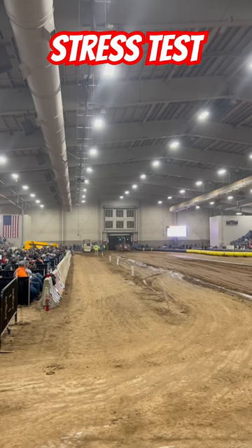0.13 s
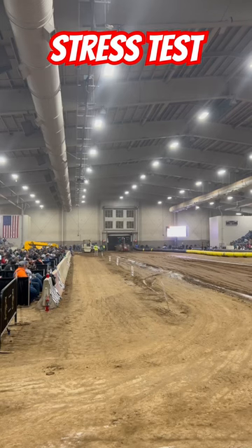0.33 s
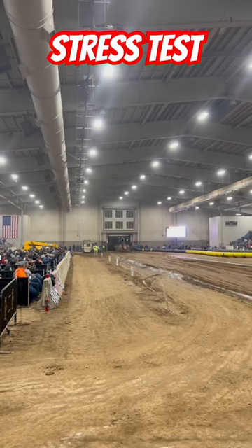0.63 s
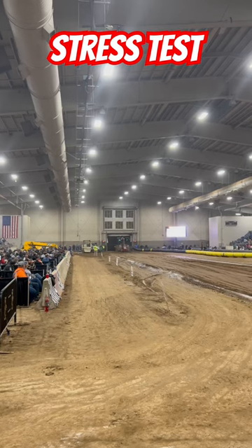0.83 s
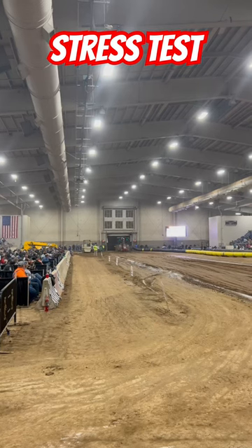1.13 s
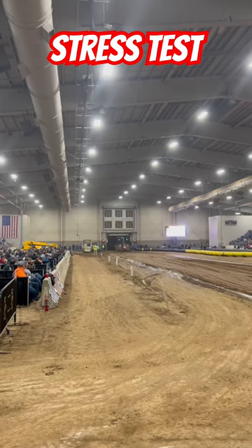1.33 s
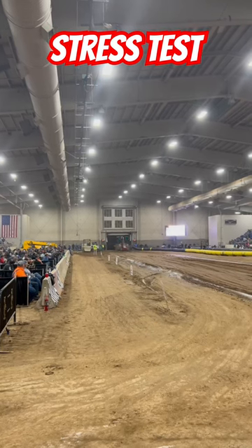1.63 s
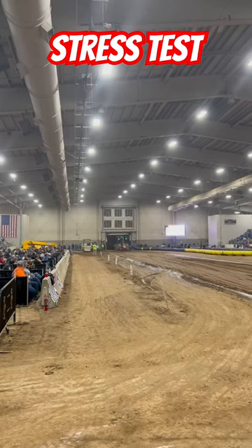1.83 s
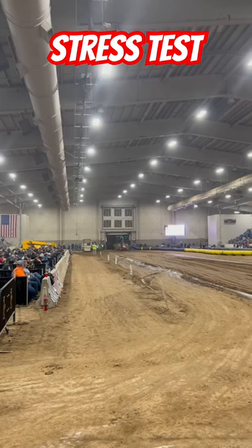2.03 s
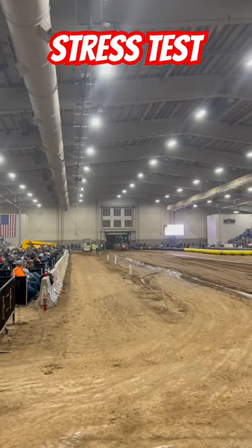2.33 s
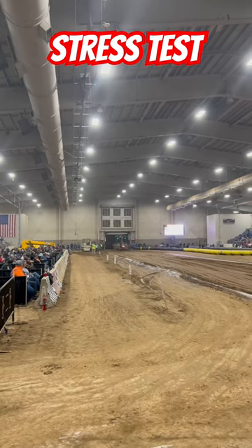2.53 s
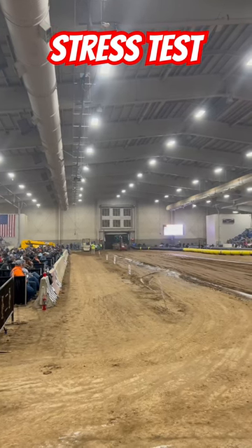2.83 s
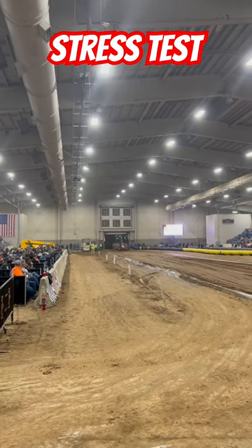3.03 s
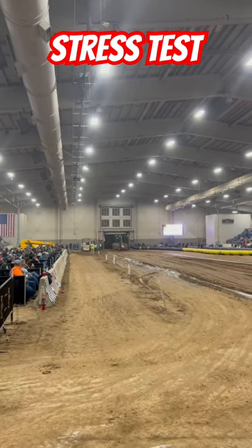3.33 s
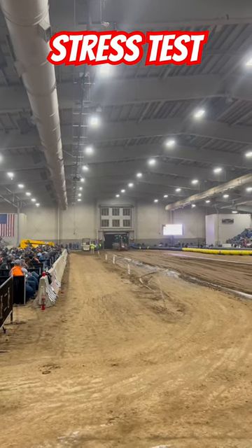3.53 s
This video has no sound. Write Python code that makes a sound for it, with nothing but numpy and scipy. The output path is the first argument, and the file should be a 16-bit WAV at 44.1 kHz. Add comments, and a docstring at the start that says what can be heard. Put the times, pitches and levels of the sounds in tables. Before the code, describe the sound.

A tractor's turbo-diesel roars from the far end of a large indoor arena, its droning note climbing and fluttering; the turbo whistle rises with a rush of air, then the engine turns deeper and rougher. Distant stereo microphone.

```python
"""Pulling tractor in an indoor arena

A six-cylinder turbo-diesel winds up under load at the far end of a large hall. The firing note climbs and fades
in and out; sines locked to the engine cycle make it, the boom and the lines of uneven cylinders.
Banded noise makes the exhaust roar, a repeated random pattern the crackle, sines the turbo's rising whistle.
Noise makes the rush of air and a brief squeal; at full boost the engine turns deeper and rougher."""
import sys
import numpy as np
from scipy import signal
from scipy.io import wavfile
from scipy.ndimage import uniform_filter1d, minimum_filter1d

SR = 44100
rng = np.random.default_rng(int(sys.argv[2]) if len(sys.argv) > 2 else 0)


def persist_wave(psi):
    """Save psi, clipped to +-1, as 16-bit WAV."""
    counts = np.round(np.clip(psi, -1, 1) * 32767).astype(np.int16)
    wavfile.write(sys.argv[1], SR, np.atleast_2d(counts).T)


N = 163170
T = np.arange(-SR, N) / SR   # seconds; the engine is already running a second earlier
FADE_HZ = 3.95   # how fast lines wander as reflections add and cancel

# Engine speed. Each row: time in seconds, firings per second.
FIRING_RATE = [(0, 214), (.3, 217), (.6, 223), (1, 227), (1.35, 230.5), (1.7, 237.5), (2.05, 242),
               (2.3, 249), (2.6, 251.3), (3.05, 252.3), (3.4, 249), (3.7, 246)]
# Exhaust roar. Each row: time in seconds, level of the low roar in dB, level of the rasp in dB,
# both before each layer's own offset.
ROAR = [(0.06, -30, -33.5), (0.41, -27.5, -34), (0.46, -28.5, -33), (1.61, -30.5, -29), (1.66, -27, -27.5),
        (2.1, -28.5, -30), (2.35, -26, -30.5), (2.44, -27.5, -29), (2.93, -24, -27.5), (3.1, -25.5, -29.5),
        (3.68, -26.5, -31)]
# Lines from unequal cylinders. Each entry: multiple of the six-firing engine cycle.
UNEVEN_ORDERS = [3, 4, 5, 7, 8, 9, 10, 12, 14, 15, 16, 20]


def from_db(db):
    """Decibels to gain."""
    return 10 ** (np.asarray(db) / 20)


def rms_one(x):
    """Scale to unit power."""
    return x / np.sqrt(np.mean(x ** 2) + 1e-20)


def in_time(rows):
    """Each column of a curve at every sample."""
    s, *columns = np.transpose(rows)
    return [np.interp(T, s, c) for c in columns]


def at_hz(points, hz):
    """Read a spectrum on a log-frequency axis."""
    f, v = np.transpose(points)
    return np.interp(np.log(hz), np.log(f), v)


def swell(centre_s, length_s):
    """A smooth rise and fall, peaking at 1."""
    return np.exp(-((T - centre_s) / length_s) ** 2)


def stage(centre_s, rise_s):
    """A smooth step from 0 to 1."""
    return (1 + np.tanh((T - centre_s) / rise_s)) / 2


def drift(rate_hz):
    """Slow chance of unit power: noise through two equal low-passes, computed every 40 samples."""
    step = 40
    r = np.exp(-2 * np.pi * rate_hz * step / SR)
    noise = rng.standard_normal(len(T) // step + 2002)
    slow = signal.lfilter([1], [1, -2 * r, r * r], noise)[2000:]   # drop the filter's start
    return np.interp(np.arange(len(T)) / step, np.arange(len(slow)), rms_one(slow))


def fading():
    """Slowly changing strength and phase of the reflections of one line."""
    return (drift(FADE_HZ) + 1j * drift(FADE_HZ)) / np.sqrt(2)


def spread(mid, side, hz):
    """Left and right, as wide as the hall makes this frequency."""
    # Hall width. Each row: frequency in Hz, side against middle in dB.
    width = [(60, -43), (96, -21), (150, -19), (250, -20.5), (400, -3.5), (630, 0), (1020, 0.5), (1630, -7),
             (2610, -6.5), (4190, -7), (6710, 1.5), (10800, -6.5)]
    # Balance between the sides. Each row: frequency in Hz, left minus right in dB.
    lean = [(60, -0.36), (130, -0.12), (260, 1.8), (550, -0.7), (1160, -3), (2440, -0.29), (5130, -0.085),
            (10800, -0.5)]
    sign = np.array([[1], [-1]])
    stereo = mid + sign * side * from_db(at_hz(width, hz))
    return stereo * from_db(sign * at_hz(lean, hz) / 2)


def band_pass(x, low_hz, high_hz):
    """Keep one frequency band."""
    return signal.sosfilt(signal.butter(3, [low_hz, high_hz], "band", fs=SR, output="sos"), x)


def turbulence(spectrum):
    """Stereo noise in third-octave bands that flicker separately; the middle has unit power."""
    flicker_db, flicker_hz = 1.0, 15.5
    lowest, highest = spectrum[0][0], spectrum[-1][0]
    bands = int(round(3 * np.log2(highest / lowest)))
    edges = np.geomspace(lowest, highest, bands + 1)
    white = rng.standard_normal((2, 2, len(T)))   # two stereo noises, used by alternate bands
    out = 0
    for k, (low, high) in enumerate(zip(edges, edges[1:])):
        mid, side = band_pass(white[k % 2], low, high)
        hz = np.sqrt(low * high)
        level = from_db(at_hz(spectrum, hz) + flicker_db * drift(flicker_hz))
        out = out + level * spread(mid, side, hz)
    return out / np.std(out.mean(axis=0))


def resonance(hz, width_hz):
    """Stereo noise ringing in two equal two-pole resonators in a row."""
    r = np.exp(-np.pi * width_hz / SR)
    poles = [1, -2 * r * np.cos(2 * np.pi * hz / SR), r * r]
    noise = rng.standard_normal((2, len(T)))
    mid, side = rms_one(signal.sosfilt([[1, 0, -1] + poles] * 2, noise))
    return spread(mid, side, hz)


def hall(x, t60):
    """Dense reflections dying away by 60 dB in t60 seconds, different on each side."""
    t = np.arange(SR) / SR
    tail = rng.standard_normal((2, SR)) * from_db(-60 * t / t60)
    tail = rms_one(tail) / np.sqrt(SR)
    return signal.fftconvolve(x[None], tail, axes=1)[:, :len(T)]


def standing_out(k):
    """Extra dB of one engine line, which stands out for a moment."""
    # Each row: multiple of the engine cycle, time in seconds, half length in seconds, gain in dB.
    line_swells = [(14, .85, .12, 4), (14, 1.7, .15, 5), (10, 1.95, .15, 7), (4, 2.3, .15, 6),
                   (20, 2.28, .16, 5), (16, 2.98, .17, 8)]
    return sum(db * swell(s, length) for multiple, s, length, db in line_swells if round(multiple) == k)


def engine_lines(cycle, cycle_hz):
    """Firing note, crankshaft boom and the lines of unequal cylinders, all locked to the engine cycle."""
    # Firing note. Each row: time in seconds, level in dB.
    firing = [(0.05, -19), (0.24, -20.5), (0.3, -29), (0.38, -17), (0.46, -19.5), (0.49, -33),
              (0.52, -19.5), (0.58, -19), (0.635, -25), (0.67, -23), (0.76, -16.5), (0.92, -20.5),
              (0.96, -24.5), (1.08, -20), (1.16, -28), (1.3, -13), (1.42, -15), (1.48, -27), (1.55, -16.5),
              (1.62, -23.5), (1.66, -18.5), (1.94, -17.5), (1.99, -32), (2.02, -16.5), (2.08, -37),
              (2.11, -15), (2.18, -30.5), (2.21, -16), (2.24, -29.5), (2.29, -13.5), (2.32, -29),
              (2.36, -12.5), (2.59, -23), (2.61, -13), (3.13, -9.5), (3.22, -15), (3.27, -23), (3.295, -42),
              (3.32, -19.5), (3.37, -11), (3.49, -17.5), (3.68, -10.5)]
    # Once-per-turn crankshaft boom. Each row: time in seconds, level in dB.
    boom = [(0, -39), (1.3, -41), (1.5, -31), (2.05, -30.5), (2.12, -36), (2.25, -21), (2.36, -28.5),
            (2.55, -18), (2.8, -13.5), (2.96, -22), (3.1, -22), (3.3, -32), (3.45, -38), (3.54, -26),
            (3.7, -53)]
    # Levels of the uneven-cylinder lines in dB, one per order: winding up, turbo spooling, full load.
    winding_db = [-39.5, -30, -41, -51.5, -33, -57.5, -46, -48.5, -41, -51, -44, -41]
    spooling_db = [-41, -30.5, -34.5, -45.5, -27, -44.5, -34.5, -40.5, -33.5, -47.5, -70, -44]
    loaded_db = [-31, -34.5, -30.5, -38.5, -40.5, -33, -35, -36.5, -33.5, -40, -35, -42.5]
    steady_share, fading_share = 0.79, 0.6
    spool, load = stage(1.13, 0.13), stage(2.3, 0.48)

    out = 0
    for k, curve in ((6, firing), (2, boom)):
        line = from_db(in_time(curve)[0]) * np.exp(1j * k * cycle)
        out = out + spread(line.real, (line * fading()).real, k * cycle_hz)
    for k, winding, spooling, loaded in zip(UNEVEN_ORDERS, winding_db, spooling_db, loaded_db):
        db = winding + (spooling - winding) * spool + (loaded - spooling) * load + standing_out(k)
        line = from_db(db) * np.exp(1j * (k * cycle + 2 * np.pi * rng.random()))
        mid = (line * (steady_share + fading_share * fading())).real
        out = out + spread(mid, (line * fading()).real, k * cycle_hz)
    return np.sqrt(2) * out   # levels are RMS


def growl(cycle, cycle_hz):
    """The higher engine lines arrive only by reflection, each fading in and out."""
    level_db, slope_db, scatter_db = -19, -7.5, 4.5   # against the low roar, per octave, unevenness
    low_roar_db = in_time(ROAR)[0]
    out = 0
    for k in sorted(set(range(11, 31)) - set(UNEVEN_ORDERS)):
        octaves = np.log2(k / 16)
        db = level_db + slope_db * octaves + scatter_db * rng.standard_normal()
        line = from_db(db) * np.exp(1j * k * cycle)
        out = out + spread((line * fading()).real, (line * fading()).real, k * cycle_hz)
    return np.sqrt(2) * from_db(low_roar_db) * out


def exhaust(cycle):
    """Turbulent gas from the stack: swelling rumble, low roar and rasp puffing with crankshaft and firings."""
    # Colour of each noise. Each row: frequency in Hz, relative band level in dB.
    rumble_spectrum = [(25, -14), (45, -15), (68, -13), (88, -3), (115, -17), (230, -3), (320, -3),
                       (420, -14), (700, -36)]
    low_spectrum = [(200, -27.5), (330, -5.5), (450, -2), (600, 1.5), (800, -4), (1000, -9), (1400, -18.5),
                    (2500, -41.5)]
    rasp_spectrum = [(600, -3.5), (1000, -2), (1300, 1.5), (1800, -1), (2300, -1.5), (3000, 0), (3900, -6),
                     (5100, -12), (6300, -18), (7500, -20.5), (9500, -27), (11000, -49.5), (14000, -66.5)]
    # Ringing peaks in the rasp. Each row: frequency in Hz, width in Hz, level against the rasp in dB.
    rasp_peaks = [(2300, 400, -13), (2996, 500, -14), (6160, 750, -19)]
    low_offset_db, rasp_offset_db, puff_depth = -2, -1.5, 0.061
    rumble_db, rumble_swell_db = -34, 9.5

    low_db, rasp_db = in_time(ROAR)
    puffs = rms_one(1 + puff_depth * (np.cos(2 * cycle) + np.cos(6 * cycle)) / 2)
    rumble_level = from_db(rumble_db + rumble_swell_db * swell(2.75, 0.55))
    rumble = rumble_level * turbulence(rumble_spectrum)
    low = from_db(low_db + low_offset_db) * turbulence(low_spectrum)
    ringing = sum(from_db(db) * resonance(hz, width) for hz, width, db in rasp_peaks)
    rasp = from_db(rasp_db + rasp_offset_db) * (turbulence(rasp_spectrum) + ringing)
    return rumble + puffs * (low + rasp)


def crackle(cycle):
    """Every engine cycle repeats one pattern of sharp cracks, which the reflections slowly reshape."""
    low_hz, high_hz, crackle_db = 1200, 2800, -5   # level against the rasp curve
    angles = np.linspace(0, 2 * np.pi, int(SR * 6 / FIRING_RATE[-1][1]))
    sides = []
    for turn in (drift(FADE_HZ), drift(FADE_HZ)):   # middle, side
        cracks = 0
        for share in (np.cos(turn), np.sin(turn)):   # blend two fixed patterns
            pattern = rng.laplace(size=len(angles))
            cracks = cracks + share * np.interp(cycle % (2 * np.pi), angles, pattern)
        sides.append(cracks)
    mid, side = rms_one(band_pass(sides, low_hz, high_hz))
    rasp_db = in_time(ROAR)[1]
    return from_db(rasp_db + crackle_db) * spread(mid, side, (low_hz + high_hz) / 2)


def turbo():
    """Two wavering whistles locked to the rotor speed, direct and smeared by the hall, and rushing intake air."""
    # Main whistle pitch. Each row: time in seconds, frequency in Hz.
    whistle_pitch = [(0, 5000), (.5, 5500), (1, 6230), (1.22, 6620), (1.5, 7750), (1.8, 9300), (2, 9850),
                     (2.3, 10450), (2.5, 11200), (2.7, 12050), (3, 12800), (3.3, 13050), (3.7, 13150)]
    # Main whistle before direct sound and hall are added. Each row: time in seconds, level in dB.
    whistle_level = [(0, -54), (.5, -51), (.8, -44), (1.2, -43), (1.55, -47), (1.9, -42), (2.2, -45),
                     (2.5, -53), (2.7, -59), (3, -69), (3.3, -74), (3.7, -74)]
    # Rush of intake air. Each row: time in seconds, level in dB.
    rush_level = [(0, -68), (1, -47.5), (1.35, -40.5), (1.65, -33), (1.97, -35), (2.2, -47), (2.6, -59),
                  (3.7, -50.5)]
    # Colour of the rush. Each row: frequency in Hz, relative band level in dB.
    rush_spectrum = [(2500, 15), (4000, -2.5), (5000, -9.5), (6200, 6), (7300, -1), (8500, 18.5),
                     (9500, -23), (10700, -25), (13000, -49)]
    direct, waver, waver_hz, treble_t60_s = .5, .005, 70, 0.82
    second_ratio, second_db = .878, -53   # a weaker, lower whistle

    hz = in_time(whistle_pitch)[0] * (1 + waver * drift(waver_hz))
    phase = 2 * np.pi * np.cumsum(hz) / SR
    main = from_db(in_time(whistle_level)[0]) * np.sin(phase)
    second = from_db(second_db) * swell(2.15, .25) * np.sin(second_ratio * phase)
    whistle = np.sqrt(2) * (main + second)
    rush = from_db(in_time(rush_level)[0]) * turbulence(rush_spectrum)
    return direct * whistle + hall(whistle, treble_t60_s) + rush


def squeal():
    """A brief, faint, breathy tone: noise in one narrow resonance."""
    return from_db(-33) * swell(1.99, .18) * resonance(1725, width_hz=45)


def scene():
    """Engine, exhaust and turbocharger, heard across the arena."""
    cycle_hz = in_time(FIRING_RATE)[0] / 6   # six firings make one cycle, two crankshaft turns
    cycle = 2 * np.pi * np.cumsum(cycle_hz) / SR
    engine = engine_lines(cycle, cycle_hz.mean()) + growl(cycle, cycle_hz.mean())
    return (engine + exhaust(cycle) + crackle(cycle) + turbo() + squeal())[:, -N:]


def record(dry):
    """The sound starts abruptly; a limiter turns the highest peaks down; the top is cut at the microphone."""
    start_s, ceiling, limiter_s, cutoff_hz = .0355, .9, .012, 15700
    opened = np.clip((T[-N:] - start_s) / .0005, 0, 1)
    size = int(limiter_s * SR)
    needed = ceiling / np.maximum(abs(dry).max(axis=0), ceiling)
    gain = uniform_filter1d(minimum_filter1d(needed, size), size)
    top_cut = signal.cheby2(12, 70, cutoff_hz, fs=SR, output="sos")
    return signal.sosfilt(top_cut, dry * gain * opened)


dry = scene()
out = record(dry)
persist_wave(out)
```